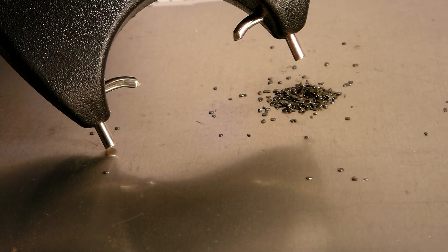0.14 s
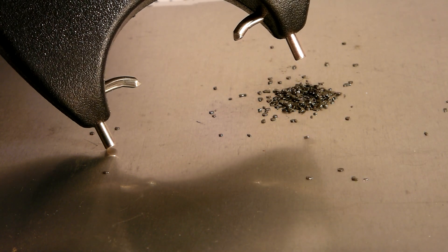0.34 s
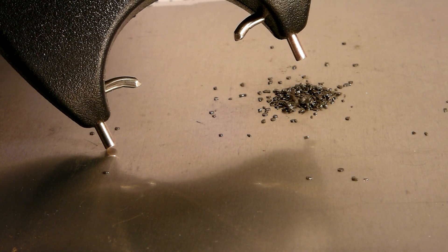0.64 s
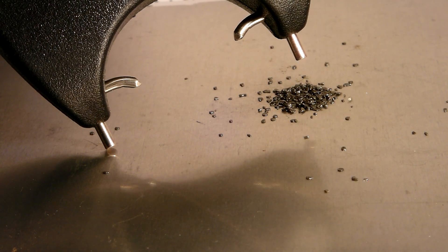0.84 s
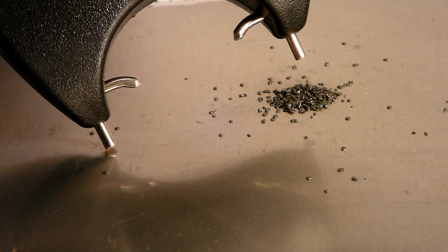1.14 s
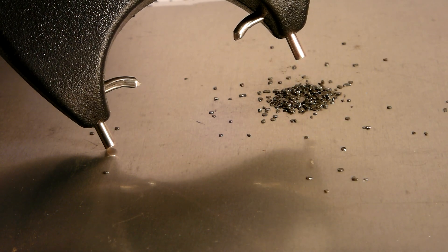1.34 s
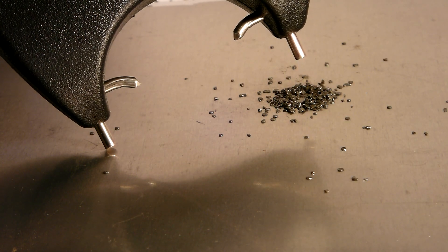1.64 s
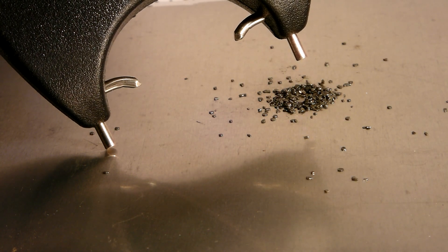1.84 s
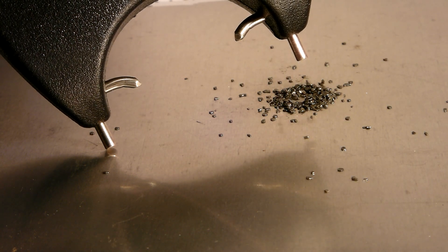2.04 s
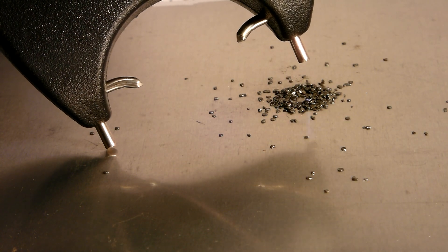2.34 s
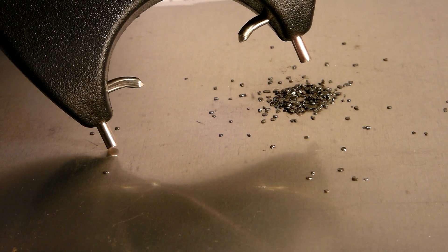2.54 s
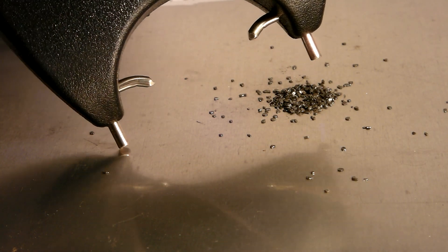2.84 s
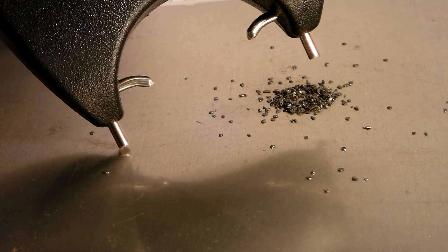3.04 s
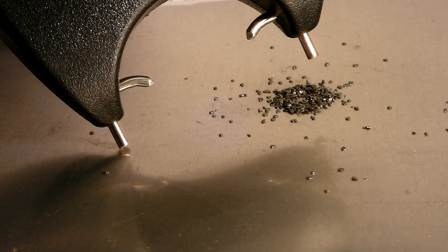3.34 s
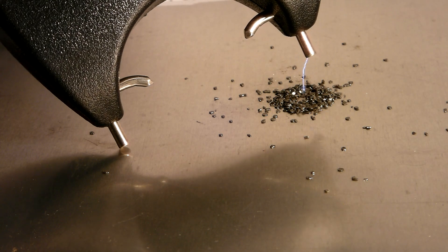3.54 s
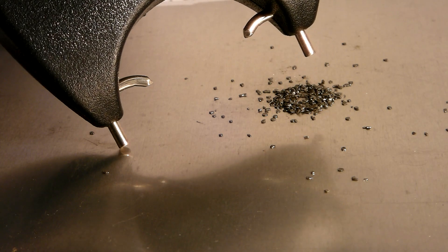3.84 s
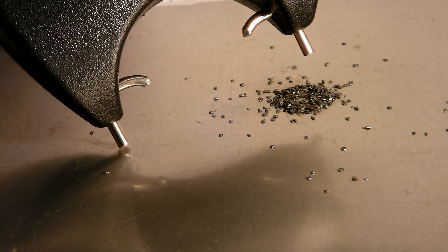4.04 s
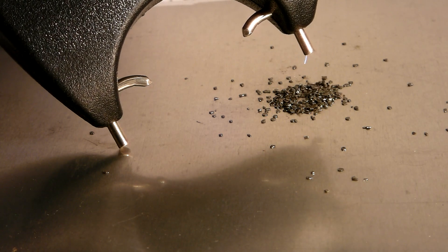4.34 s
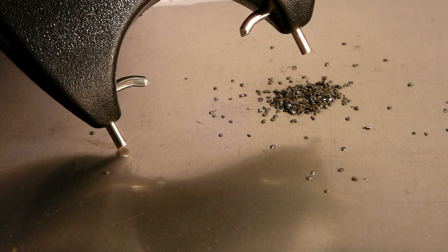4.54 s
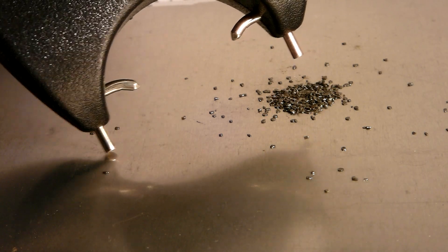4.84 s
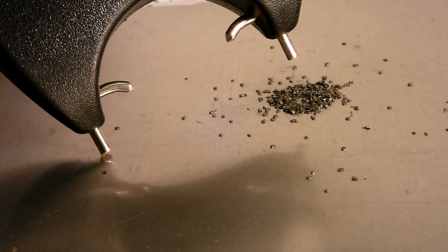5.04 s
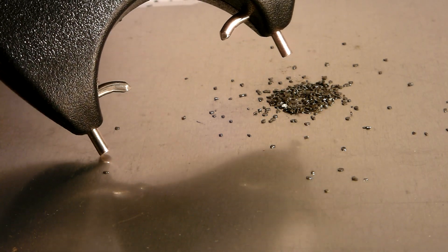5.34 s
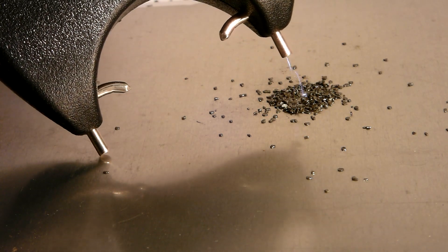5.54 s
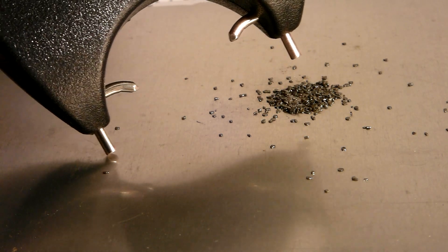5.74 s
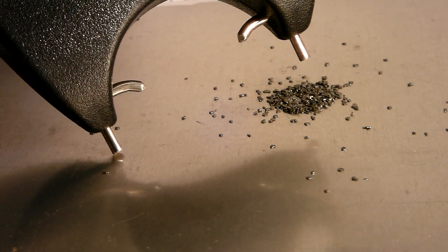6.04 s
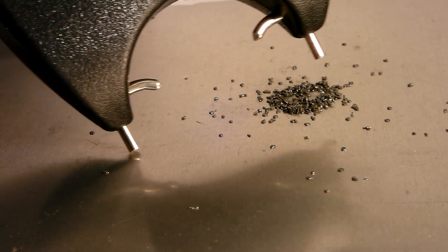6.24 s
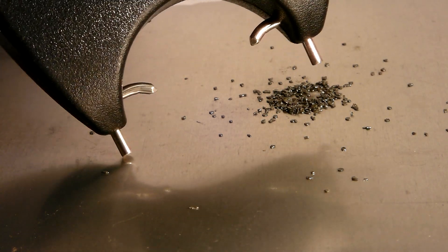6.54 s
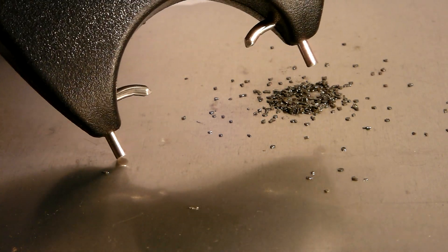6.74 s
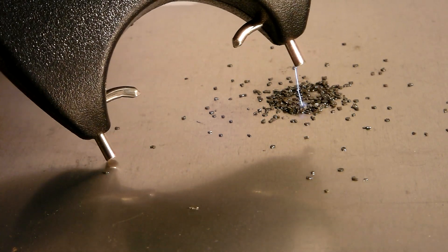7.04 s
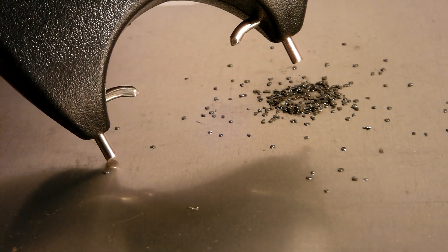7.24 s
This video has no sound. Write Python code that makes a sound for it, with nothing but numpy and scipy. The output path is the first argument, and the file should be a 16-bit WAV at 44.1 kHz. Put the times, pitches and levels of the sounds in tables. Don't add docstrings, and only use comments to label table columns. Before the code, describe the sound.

Sharp, dry electric sparks snap about eight times a second onto a powder heap, each crack briefly answered by a small room, growing louder midway.

```python
import sys
import numpy as np
from scipy import signal
from scipy.fft import rfft, irfft, next_fast_len
from scipy.io import wavfile
from scipy.ndimage import uniform_filter1d

SR = 44100
rng = np.random.default_rng(int(sys.argv[2]) if len(sys.argv) > 2 else 0)


def voltage_ratio(level):
    return 10 ** (np.asarray(level, float) / 20)


def dump_mix(stems):
    frames = np.atleast_2d(stems).T
    limited = np.clip(frames, -1, 1)
    pcm = np.round(limited * 32767).astype(np.int16)
    wavfile.write(sys.argv[1], SR, pcm)


N = 326781

# (frequency [Hz], density [dB per Hz])
HISS_COLOUR = [(30, -4), (200, -7), (1000, -4), (3000, 0), (11500, -10)]
# (time [s], level [dB], pitch at full charge [Hz])
INVERTER_WHINE = [(0, -59, 7160), (2.5, -60, 7240), (5, -58, 7300), (7.41, -53, 7350)]
# (frequency [Hz], t60 [s])
ROOM_DECAY = [(500, 0.36), (1500, 0.51), (4000, 0.52), (8000, 0.28), (11500, 0.22)]
# (frequency [Hz], correlation [0..1])
PORT_LIKENESS = [(300, 0.66), (1200, 0.96), (2000, 0.51), (4000, 0.071), (11500, 0.024)]
# (frequency [Hz], density [dB per Hz])
REFLECTION_COLOUR = [(180, -27), (300, -27), (534, -36), (661, -20), (1230, -10.5), (1480, -8.5),
                     (2480, -7.5), (3560, -5), (4280, -5.5), (4980, -5.5), (7000, -1.5), (10500, -4.5),
                     (11300, -8), (14700, -27), (22000, -120)]
# (frequency [Hz], width [Hz], level [dB])
BODY_RESONANCES = [(502, 22, 2), (640, 87, 7), (852, 54, 6), (974, 78, 0), (1448, 115, -10.5),
                   (1653, 31, 3), (2504, 170, 6.5), (6110, 230, 3), (3026, 176, 5), (4270, 184, 7.5),
                   (5343, 136, 6.5), (7204, 92, 6), (9540, 240, 6.5), (10400, 220, 7.5)]
# (start [ms], left level [dB], right level [dB], t60 [s])
REFLECTION_SWARMS = [
    (.6, -13, -15, 0.018),
    (2.202, -35, -10, 0.0054),
    (6.7, -16, -19, 0.0065),
    (7.5, -27, -27, 0.14),
]
# (delay [ms], left gain [ratio], right gain [ratio])
SHOCK_PATHS = [
    (0, -.85, 1),
    (.115, -.4, 0),
    (.2, 0, -.75),
    (.235, -.8, 0),
    (.37, -.6, .6),
    (.55, .2, -.2),
]
# (frequency [Hz], left level [dB], right level [dB])
SHOCK_SPECTRUM = [(300, -30, -25), (1290, -24, -20), (2340, -9, -1.5), (3010, -6, -1), (4550, -3, -1),
                  (7300, 0, 0), (10200, -5, -7), (12400, -12, -11.5)]
# (time [s], strength [dB])
EARLY_SPARKS = [(0.08, 0.5), (0.1944, -1.0), (0.3079, -1), (0.4242, -1.9), (0.5486, -2.5), (0.6661, -1.8),
                (0.7841, -2), (0.9035, -2.5), (1.0244, -1.6), (1.14, -2.5), (1.2582, -2.5), (1.4014, -1.1),
                (1.5239, -3), (1.6507, -1.6), (1.7709, -0.9), (1.8936, -1.3), (2.0145, -2.5),
                (2.1376, -1.4), (2.2703, -2.5), (2.3929, -2), (2.5152, -1.0), (2.65, 0.2), (2.7716, -2.5),
                (2.8957, -0.5), (3.0444, -2.5), (3.1684, -3.5), (3.2945, -2.5), (3.44, 0.3), (3.5861, -0.7),
                (3.7334, -0.5)]
# (time [s], strength [dB])
STRONGER_SPARKS = [(3.8629, -0.5), (3.9891, 1.9), (4.1143, 1.8), (4.2427, 0.9), (4.3713, 0.0),
                   (4.4963, 1.6), (4.6241, 2.5), (4.7744, 3), (4.922, 1.1), (5.0589, 3.5), (5.1852, 1.5),
                   (5.3141, 3), (5.4413, 0.7), (5.5893, 4), (5.7167, 1.1), (5.8497, 2), (5.9779, 1),
                   (6.1166, 2), (6.2459, -2.5), (6.3778, 0.3), (6.5187, 1.5), (6.6553, 1), (6.818, 1.5),
                   (6.9483, 2), (7.0793, 0), (7.2481, 3), (7.4013, 1.5)]
# (time [s], left-right balance [dB])
HAND_DRIFT = [(0, -0.9), (3.5, -1), (3.8, 1.3), (5.6, 0.2), (5.8, -1), (6.5, -1.8), (7.41, -0.5)]
# (time [s], level [dB])
CLICK_SIZE = [(0, -41.5), (2, -43.5), (4, -42.5), (7.41, -39)]

CRACK_GROWS, ROOM_GROWS, THUMP_GROWS = 0.94, 1.21, 1.56
THUMP_DB = -0.5
CLOCK_S, CLOCK_START_S = .018757, .00344
STEP_S = .036
SETTLE_S, LOUD_SETTLE_S = .0580, .0638
LOUD_DB = .9
FRAME_S = 1024 / 32000


def unit(x):
    return x / np.sqrt(np.mean(x ** 2) + 1e-20)


def along(points, hz):
    f, v = np.transpose(points)
    return np.interp(np.log(hz + 1), np.log(f + 1), v)


def filtered(x, response):
    m = next_fast_len(x.shape[-1] + 4096)
    spectrum = rfft(x, m) * response(np.fft.rfftfreq(m, 1 / SR))
    return irfft(spectrum, m)[..., :x.shape[-1]]


def add(track, s, sound):
    at = round(s * SR)
    start = max(at, 0)
    part = sound[:, max(-at, 0):][:, :N - start]
    track[:, start:start + part.shape[1]] += part


def spark_rows():
    return [(-.048, 0)] + list(EARLY_SPARKS) + list(STRONGER_SPARKS)


def hiss():
    noise = rng.standard_normal((2, N))
    return voltage_ratio(-62) * unit(filtered(noise, lambda hz: voltage_ratio(along(HISS_COLOUR, hz))))


def inverter():
    t = np.arange(N) / SR
    s, level_db, full_hz = np.transpose(INVERTER_WHINE)
    fired = np.array([row[0] for row in spark_rows()])
    since = t - fired[np.searchsorted(fired, t) - 1]
    hz = np.interp(t, s, full_hz) - 480 * np.exp(-since / 0.052)
    phase = 2 * np.pi * np.cumsum(hz) / SR
    tone = np.sqrt(2) * np.sin(phase + np.array([[0], [1]]))
    return voltage_ratio(np.interp(t, s, level_db) + np.array([[-3], [0]])) * tone


def colour(hz, share):
    body_db = sum(db * np.exp(-((hz - mid_hz) / width) ** 2) for mid_hz, width, db in BODY_RESONANCES)
    return voltage_ratio(along(REFLECTION_COLOUR, hz) + share * body_db)


def paths(count, length, fresh, turns):
    angle = turns * np.linspace(-1, 1, count)[:, None, None]
    a, b = rng.standard_normal((2, 2, length))
    new = rng.standard_normal((count, 2, length))
    drifting = np.cos(angle) * a + np.sin(angle) * b
    noise = np.sqrt(1 - fresh) * drifting + np.sqrt(fresh) * new
    turn = lambda hz: np.arccos(np.clip(along(PORT_LIKENESS, hz), -1, 1)) / 2
    pair = filtered(noise, lambda hz: np.array([np.cos(turn(hz)), np.sin(turn(hz))]))
    common, different = pair[:, 0], pair[:, 1]
    return np.stack([common + different, common - different], axis=1)


def evened(x, width_hz):
    z = rfft(x)
    bins = round(width_hz * x.shape[-1] / SR)
    power = uniform_filter1d(np.mean(np.abs(z) ** 2, axis=0), size=bins, axis=-1)
    return irfft(z * np.sqrt(power.mean(axis=-1, keepdims=True) / power), x.shape[-1])


def room_tails(count, length, t):
    noise = paths(count, length=length, fresh=0.29, turns=0.94)
    hz, frames, z = signal.stft(noise, SR, nperseg=256)
    decay = voltage_ratio(-60 * frames / along(ROOM_DECAY, hz)[:, None])
    tails = signal.istft(z * decay, SR, nperseg=256)[1][..., :length]
    build_up = np.clip(t / 0.0057, 0, 1)
    return evened(tails * voltage_ratio(np.array([[-30], [-28]])) * build_up, width_hz=80)


def close_reflections(count, length, t):
    fade = lambda ms, t60: (t > ms / 1000) * voltage_ratio(-60 * np.clip(t - ms / 1000, 0, 1) / t60)
    swarm = [voltage_ratio(np.array([[l], [r]])) * fade(ms, t60) for ms, l, r, t60 in REFLECTION_SWARMS]
    noise = paths(count, length=length, fresh=.12, turns=.5)
    early = evened(noise * (swarm[0] + swarm[1]), width_hz=500)
    late = evened(noise * (swarm[2] + swarm[3]), width_hz=250)
    return early, late


def thump(t):
    bump = lambda ms, width_ms: np.exp(-((1000 * t - ms) / width_ms) ** 2)
    left = -bump(0, .25) + .6 * bump(.85, .42)
    right = bump(.03, .22) - .6 * bump(.8, .36)
    swing = np.array([voltage_ratio(-22) * left, voltage_ratio(-23.5) * right])
    return filtered(swing, lambda hz: 1j * hz / (150 + 1j * hz))


def shock(t):
    f, left, right = np.transpose(SHOCK_SPECTRUM)
    level_db = lambda hz: np.array([along(np.transpose([f, db]), hz) for db in (left, right)])
    jump = lambda hz: voltage_ratio(level_db(hz)) * np.exp([[.5j], [-.5j]])
    delayed = lambda hz, ms: np.exp(-2j * np.pi * hz * ms / 1000)
    arrivals = lambda hz: sum(np.outer([l, r], delayed(hz, ms)) for ms, l, r in SHOCK_PATHS)
    impulse = (t == 0) * np.ones((2, 1))
    wave = filtered(impulse, lambda hz: jump(hz) * arrivals(hz))
    peak = np.abs(wave).max(axis=1, keepdims=True)
    return voltage_ratio(np.array([[-4.7], [.6]])) * wave / peak


def sparks():
    fired, strength_db = np.transpose(spark_rows())
    count, lead, length = len(fired), 204, 12000
    t = (np.arange(length) - lead) / SR
    first, second = close_reflections(count, length, t)
    tails = room_tails(count, length, t)
    direct, low = shock(t), thump(t)
    ceiling = np.roll(direct, round(.0066 * SR), axis=1)
    ceiling = ceiling * voltage_ratio(np.array([[-6], [-9.5]])) * [[1], [-1]]
    kick = voltage_ratio(0.9 * rng.standard_normal(count))
    pans_db = np.interp(fired, *np.transpose(HAND_DRIFT))
    shocks, echoes, room = np.zeros((3, 2, N))
    for i, (s, db) in enumerate(zip(fired, strength_db)):
        crack_db, room_db = CRACK_GROWS * db, ROOM_GROWS * db
        early = voltage_ratio(crack_db) * first[i]
        late = voltage_ratio(room_db) * second[i]
        side = voltage_ratio(np.array([[.5], [-.5]]) * pans_db[i])
        start = s - 200 / SR
        add(echoes, start, side * (early + late))
        add(room, start, side * voltage_ratio(room_db) * tails[i])
        crack = kick[i] * voltage_ratio(0.63 * crack_db) * direct
        push = voltage_ratio(THUMP_DB + THUMP_GROWS * db) * low
        add(shocks, start, crack + voltage_ratio(room_db) * ceiling + push)
    echoes = filtered(echoes, lambda hz: colour(hz, share=1))
    room = filtered(room, lambda hz: colour(hz, share=0.073))
    return shocks + voltage_ratio(5.5) * (echoes + room)


def scene():
    return hiss() + inverter() + sparks()


def gain_steps():
    tick = lambda s: CLOCK_START_S + CLOCK_S * np.ceil((s - CLOCK_START_S) / CLOCK_S)
    rows = spark_rows()
    ends = [row[0] for row in rows[1:]] + [N / SR]
    steps = np.zeros(N)
    for (s, db), until in zip(rows, ends):
        down = np.append(s + .0098, tick(s + SETTLE_S) - np.array([.0460, .0370]))
        settle = LOUD_SETTLE_S if db > LOUD_DB else SETTLE_S
        up = np.arange(tick(s + settle), until, STEP_S)
        for times, sign in ((down, 1), (up, -1)):
            inside = times[(times >= 0) & (times < N / SR)]
            steps[np.round(inside * SR).astype(int)] = sign
    s, size_db = np.transpose(CLICK_SIZE)
    steps = steps * voltage_ratio(np.interp(np.arange(N) / SR, s, size_db))
    t = np.arange(200) / SR
    click = np.exp(-(t / .0007) ** 1.5)
    return np.outer([-.5, 1], np.convolve(steps, click)[:N])


def smear(x, noise_db, start_s):
    hop = round(FRAME_S * SR)
    shift = hop - round(start_s * SR)
    shape = dict(window="cosine", nperseg=2 * hop, noverlap=hop)
    z = signal.stft(np.pad(x, ((0, 0), (shift, 0))), **shape)[2]
    band = np.abs(uniform_filter1d(np.abs(z) ** 2, size=10, axis=1)) ** .5
    hz = np.fft.rfftfreq(2 * hop, 1 / SR)[:, None]
    band = band * hz / (hz + 450)
    error = band * np.exp(2j * np.pi * rng.random(z.shape))
    return x + voltage_ratio(noise_db) * signal.istft(error, **shape)[1][:, shift:shift + N]


def band_limit(x):
    return signal.sosfilt(signal.butter(12, 12520, fs=SR, output="sos"), x)


def record(dry):
    x = smear(dry + gain_steps(), noise_db=-10.5, start_s=.003)
    skirt = lambda hz: voltage_ratio(-13 - (hz - 11500) / 60)
    x = filtered(x, lambda hz: np.where(hz < 11520, 1, skirt(hz)))
    x = np.clip(x, -1, 1)
    return band_limit(x)


dry = scene()
out = record(dry)
dump_mix(out)
```